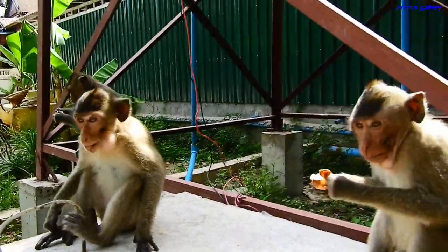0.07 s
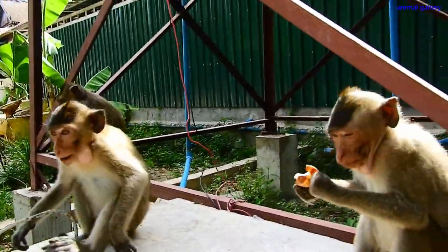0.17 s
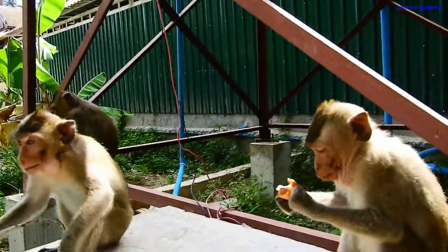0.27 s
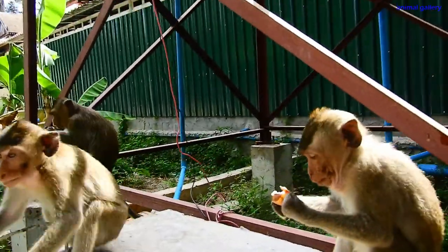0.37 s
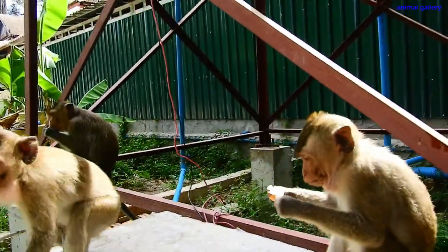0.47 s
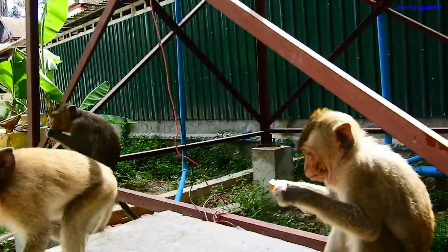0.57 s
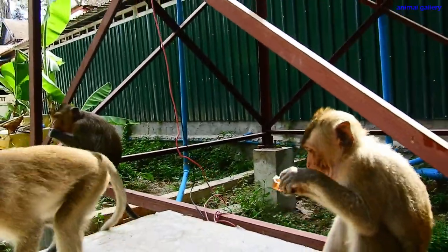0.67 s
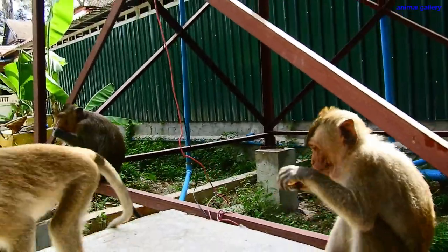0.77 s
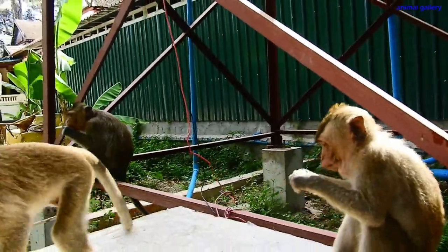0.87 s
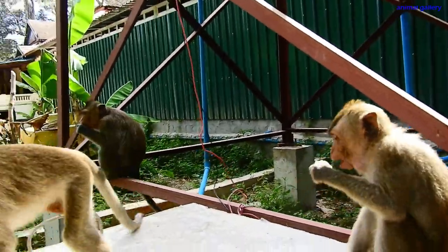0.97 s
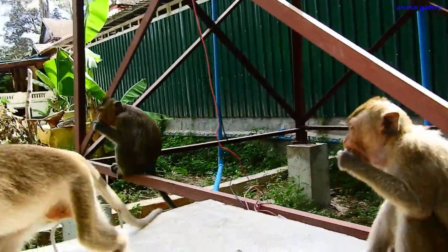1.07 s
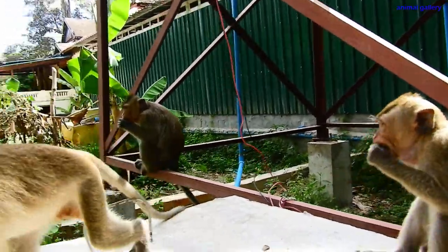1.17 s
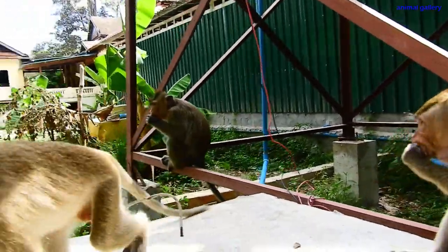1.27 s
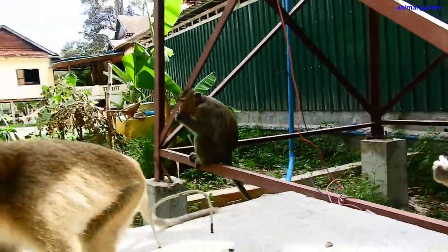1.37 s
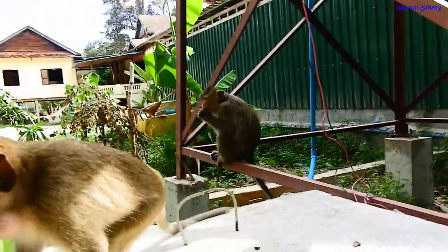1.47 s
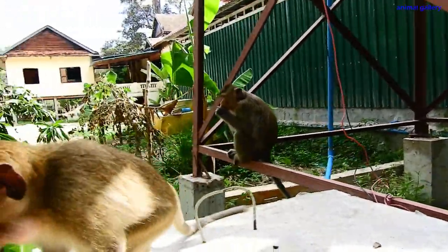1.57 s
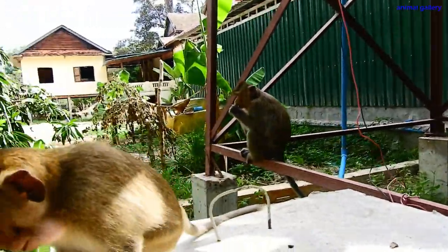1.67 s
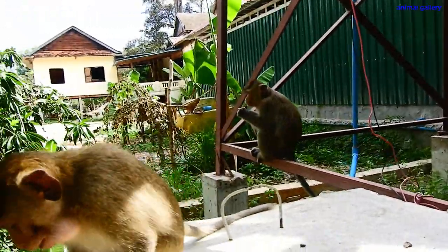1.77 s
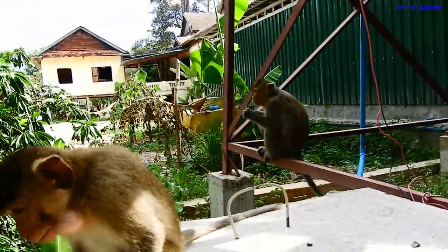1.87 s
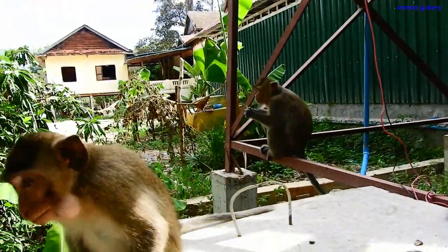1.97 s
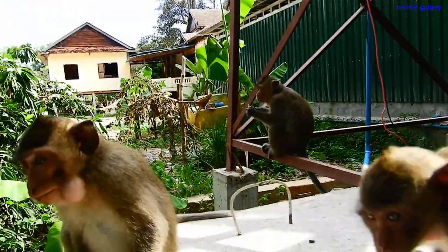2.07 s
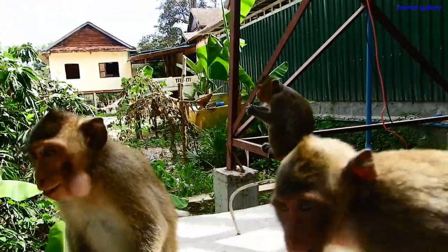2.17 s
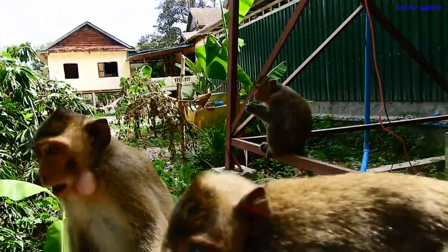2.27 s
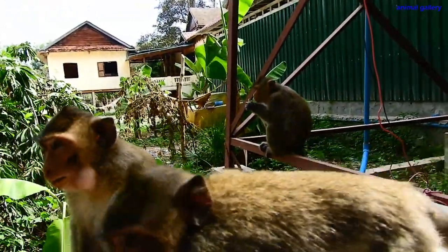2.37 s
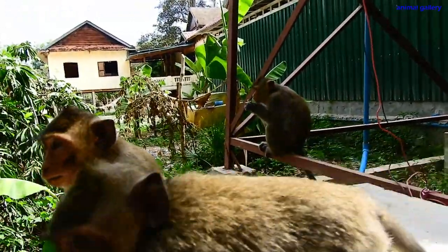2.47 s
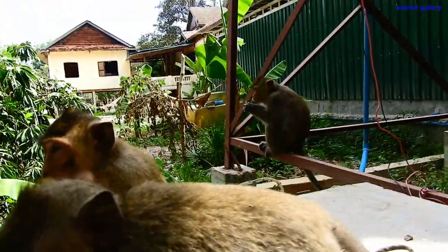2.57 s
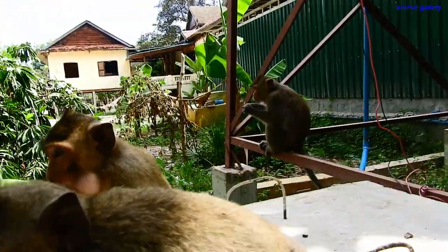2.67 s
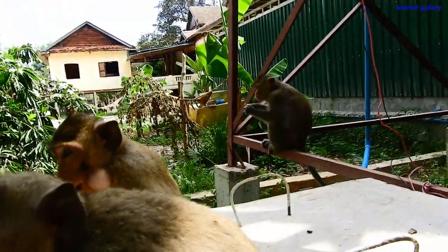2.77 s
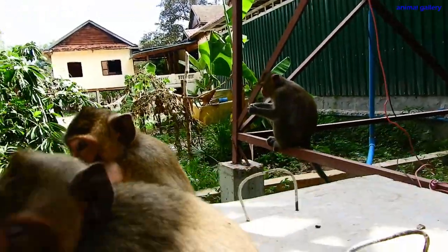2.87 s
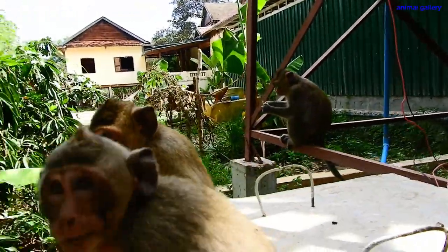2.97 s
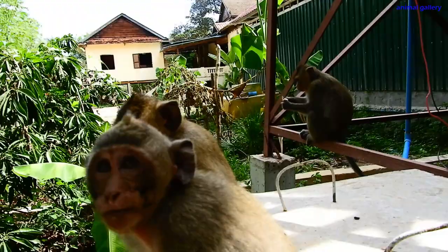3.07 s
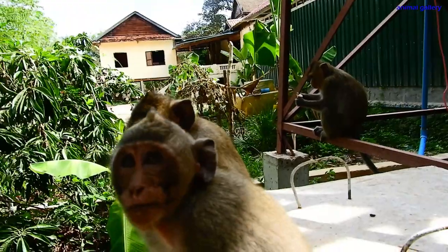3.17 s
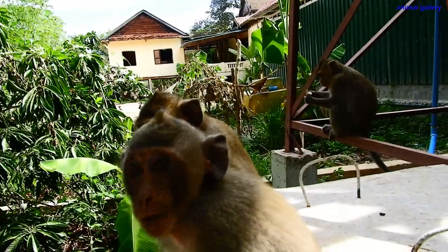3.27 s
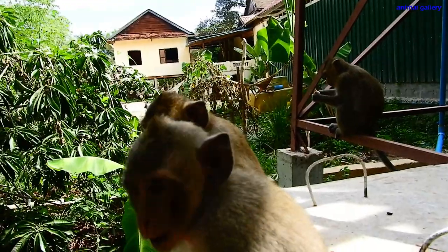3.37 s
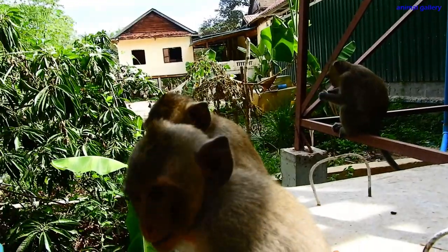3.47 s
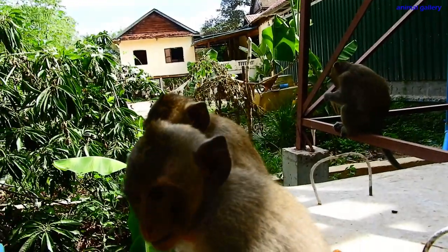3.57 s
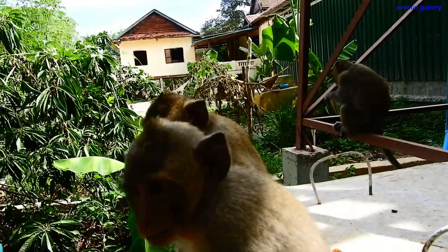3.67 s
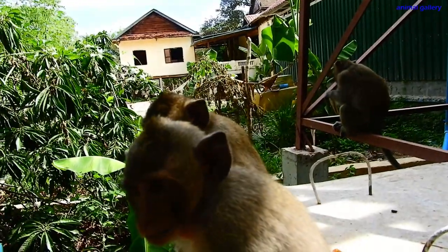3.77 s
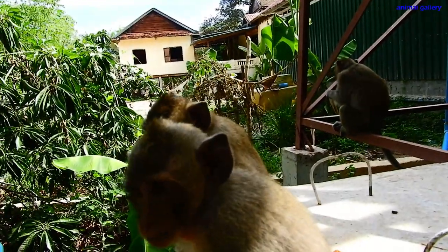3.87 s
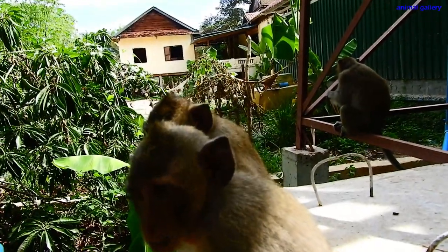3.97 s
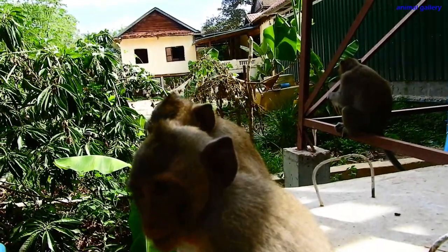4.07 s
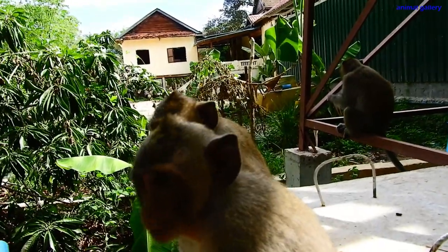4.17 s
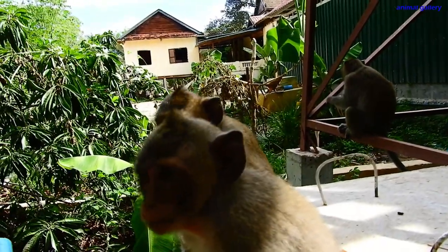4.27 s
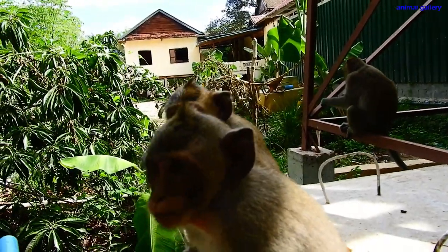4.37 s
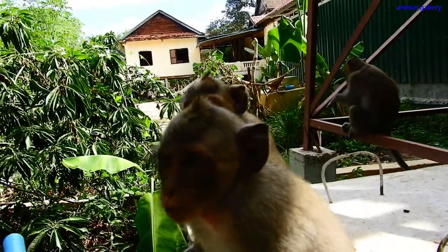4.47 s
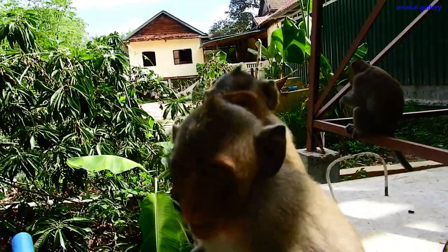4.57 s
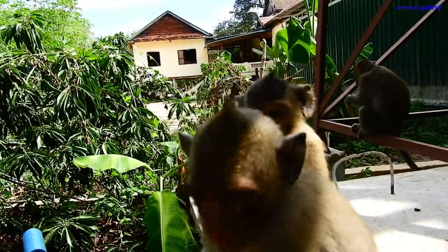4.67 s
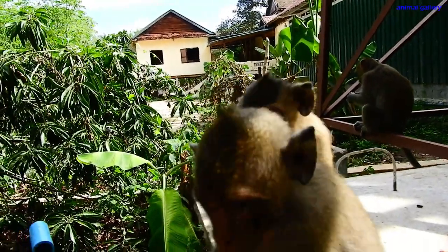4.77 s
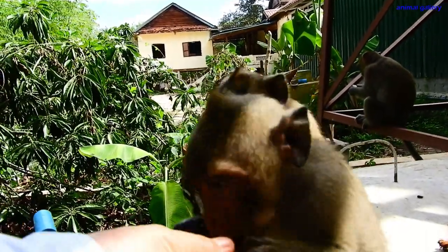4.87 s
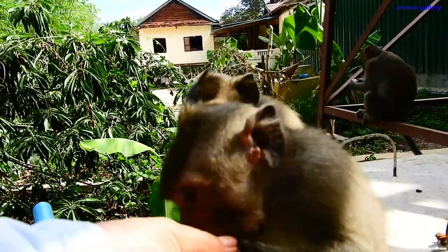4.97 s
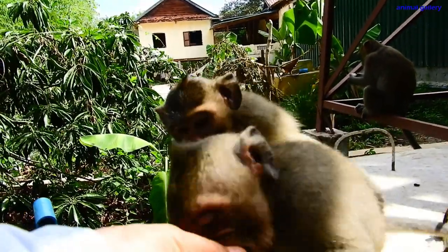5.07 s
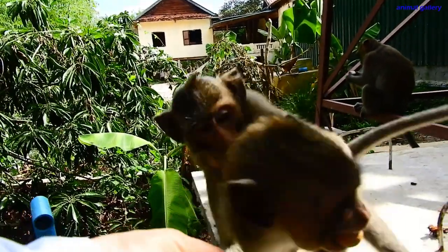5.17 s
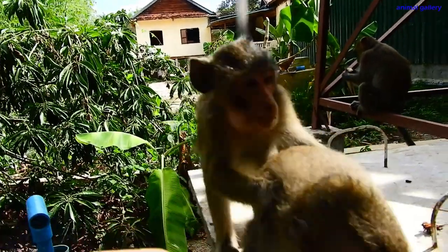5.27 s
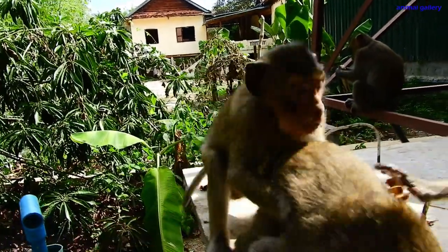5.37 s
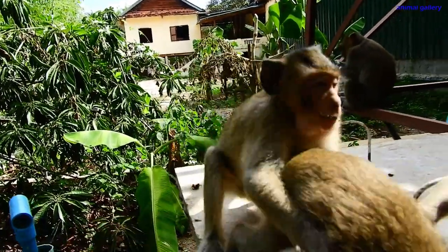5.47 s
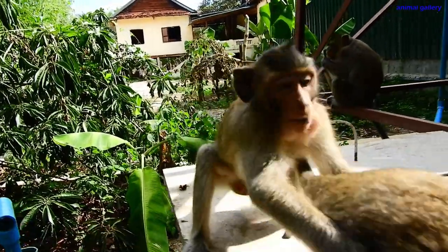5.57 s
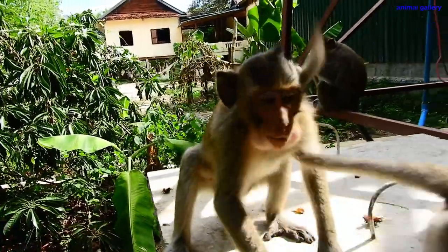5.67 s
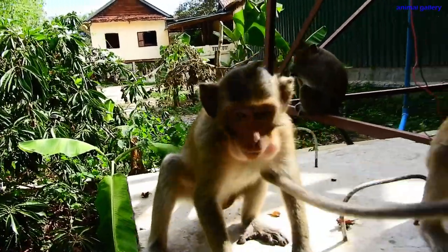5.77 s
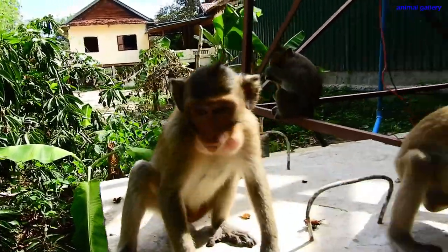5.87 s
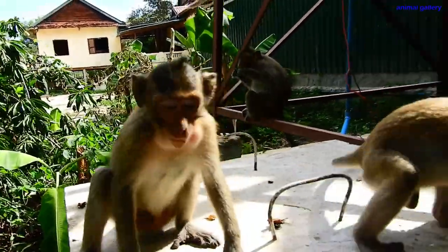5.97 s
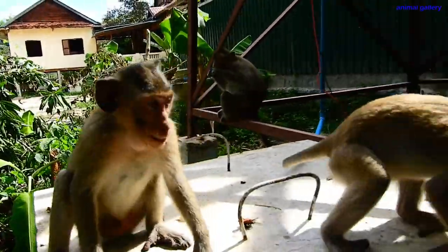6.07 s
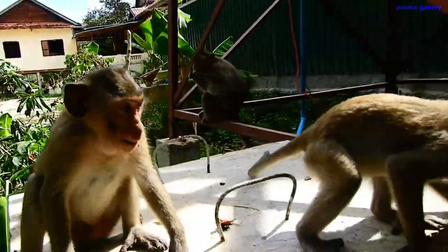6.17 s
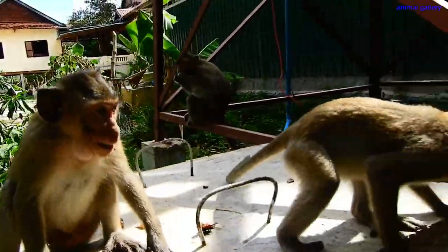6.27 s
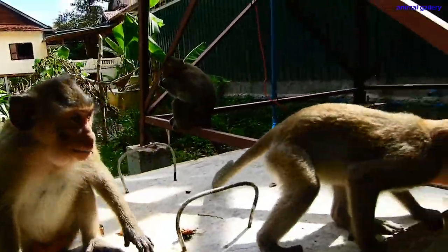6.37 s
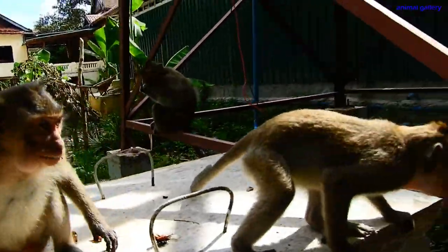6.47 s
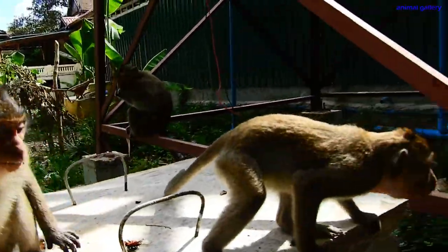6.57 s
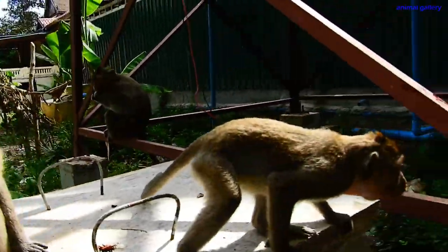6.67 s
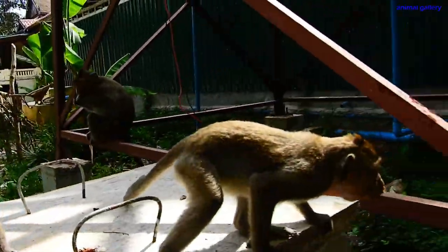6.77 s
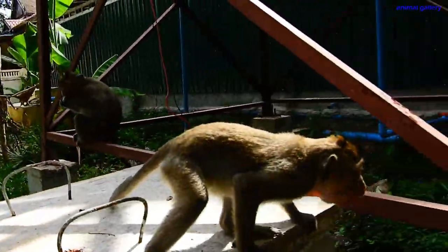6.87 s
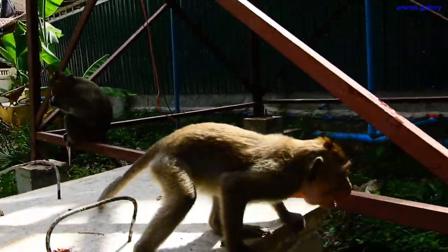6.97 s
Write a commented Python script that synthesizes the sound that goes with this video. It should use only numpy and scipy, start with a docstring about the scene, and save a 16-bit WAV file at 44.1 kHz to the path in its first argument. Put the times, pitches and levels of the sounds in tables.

```python
"""A quick run of grunts and one shrill squeal, harsh at first, then clear, then falling, from a macaque nearby.
Monkeys scuffle on a concrete slab and bump a steel frame; insects buzz and chirp over a distant rumble.
The voice sums jittered harmonics with chaotic rasp; contacts are decaying noise bursts and ringing modes.
Insects and air are filtered noise. A gain control ducks under the squeal and slowly recovers."""
import sys
import numpy as np
from scipy import signal
from scipy.fft import rfft, irfft, next_fast_len
from scipy.io import wavfile
from scipy.ndimage import uniform_filter1d, minimum_filter1d, map_coordinates

SR = 44100
rng = np.random.default_rng(int(sys.argv[2]) if len(sys.argv) > 2 else 0)


def log_audio(samples):
    """Write samples as a 16-bit WAV file to the path given in sys.argv[1]."""
    # one column per channel
    frames = np.atleast_2d(samples).T
    # limit to full scale, then quantise
    limited = np.clip(frames, -1, 1)
    pcm = np.round(limited * 32767).astype(np.int16)
    wavfile.write(sys.argv[1], SR, pcm)


N = 309802


def amp(db):
    """Convert decibels to an amplitude ratio."""
    return 10 ** (np.asarray(db) / 20)


def unit(x):
    """Normalise the mean power, so that the rms is 1."""
    return x / np.sqrt(np.mean(x ** 2) + 1e-20)


def along(points, hz):
    """Interpolate (frequency_hz, value) points on a logarithmic frequency axis."""
    f, v = np.transpose(points)
    return np.interp(np.log(hz + 1), np.log(f + 1), v)


def curves(rows):
    """Interpolate each column after the time linearly, one value per sample from first row to last."""
    s, *cols = np.transpose(rows)
    return [np.interp(np.arange(s[0], s[-1], 1 / SR), s, c) for c in cols]


def add(track, s, sound):
    """Superpose a sound on a track from time s, cut off at the track's end."""
    part = track[..., max(0, round(s * SR)):][..., :sound.shape[-1]]
    part += sound[..., :part.shape[-1]]


def wobble(rate, n):
    """Random modulation: a smooth spline through random knots, rate knots a second."""
    knots = rng.standard_normal(int(n * rate / SR) + 4)
    return map_coordinates(knots, [np.arange(n) * rate / SR])


def filtered(x, response):
    """Linear filtering: multiply the spectrum of x by a response of frequency."""
    n = x.shape[-1]
    m = next_fast_len(n + 8192)
    return irfft(rfft(x, m) * response(np.fft.rfftfreq(m, 1 / SR)), m)[..., :n]


def noise(spectrum, shape):
    """Coloured noise of rms 1: white noise shaped by (frequency_hz, level_db) points."""
    white = rng.standard_normal(shape)
    return unit(filtered(white, lambda hz: amp(along(spectrum, hz))))


def resonant(peaks):
    """Resonance: stereo white noise through narrow peaks (centre_hz, half_width_hz, level_db), rms 1."""
    def gain(hz):
        return sum(amp(db) / (1 + ((hz - centre) / width) ** 2) for centre, width, db in peaks)
    return unit(filtered(rng.standard_normal((2, N)), gain))


def patchy(x, depth_db):
    """Spectral fluctuation: energy shifts at random between neighbouring bands, over hundredths of a second."""
    z = signal.stft(x, nperseg=256)[2]
    field = uniform_filter1d(rng.standard_normal(z.shape[1:]), size=2, axis=0)  # across frequency
    field = uniform_filter1d(field, size=6, axis=1)  # across time
    gain = amp(depth_db * np.tanh(unit(field)))
    return signal.istft(z * gain, nperseg=256)[1][:, :x.shape[-1]]


def envelope(n, db, attack, release, fade):
    """Amplitude envelope: a soft swell, an exponential fade in dB per second, and a linear release."""
    t = np.arange(n) / SR
    return amp(db - fade * t) * np.minimum(1, t / attack) ** 2 * np.minimum(1, (n / SR - t) / release)


def spread(pair):
    """Interaural coherence: two unrelated sounds form a field near mono in the bass, diffuse in the treble."""
    # left-right correlation: frequency_hz, correlation
    likeness = [(60, 0.98), (130, 0.93), (290, 0.78), (640, 0.35), (1410, 0.73), (3100, 0.3), (6820, 0.11),
                (15000, -0.21)]

    def mix(hz):
        turn = np.arccos(np.clip(along(likeness, hz), -1, 1)) / 2
        return np.array([np.cos(turn), np.sin(turn)])
    mid, side = filtered(pair, mix)
    return np.array([mid + side, mid - side])


def panned(x, right_db):
    """Level-difference panning: the right channel is right_db louder than the left."""
    return x * amp([[-right_db / 2], [right_db / 2]])


def outdoors():
    """Broadband random sound: distant rumble and leaf hiss, crackling rustles and a far whine."""
    # spectrum of the background air: frequency_hz, level_db
    air_colour = [(22, -20.5), (32, -16.5), (42, -1.5), (100, 0.5), (160, -5), (260, -14), (500, -18.5),
                  (1000, -22), (2000, -29.5), (4000, -26.5), (9300, -26.5), (11500, -40.5), (15500, -47.5)]
    # spectrum of fur and leaves: frequency_hz, level_db
    leaf_colour = [(300, -13), (800, 1.5), (1200, -1.5), (2200, 1), (2800, -2), (4000, -5.5), (9000, -5.5),
                   (12000, -28), (15500, -31.5)]
    # rustles whenever a monkey shifts: start_s, length_s, level_db
    rustle_times = [(.1, .65, -57.5), (.67, .85, -53.5), (1.38, .8, -55), (2.05, 1.0, -61),
                    (3.78, .55, -58), (4.5, .8, -65), (6.58, .6, -61)]
    # faint distant whine: start_s, length_s, level_db, attack_s, release_s, fade_db_per_s
    far_call = (3.05, 1.18, -66.5, .12, .15, 1.5)
    # resonances of the whine: centre_hz, half_width_hz, level_db
    far_tones = [(2440, 180, 3.5), (3310, 80, -2)]

    air = amp(-51 + 0.45 * wobble(6.2, N)) * noise(air_colour, (2, N))
    stir_power = np.full(N, amp(-69) ** 2)  # a faint stir never stops
    for s, length, db in rustle_times:
        swell = envelope(round(length * SR), db, attack=.04, release=.25, fade=8)
        add(stir_power, s, swell ** 2)
    crinkle = unit(patchy(noise(leaf_colour, (2, N)), depth_db=4))
    flutter = amp(1.62 * wobble(120, N) + 1.6 * wobble(16, N))
    rustle = np.sqrt(stir_power) * flutter * crinkle
    s, length, *shape = far_call
    n = round(length * SR)
    add(air, s, envelope(n, *shape) * resonant(far_tones)[:, :n])
    return spread(air + rustle)


def insects():
    """Amplitude-modulated wing resonance: one insect buzzes steadily, another pulses about six times a second."""
    # drifting pace and strength of the chirps: time_s, chirps_per_s, level_db
    chirping = [(0.0, 6.043, -57.9), (1.0, 6.25, -54.8), (1.95, 6.528, -62.6), (2.5, 5.683, -58.0),
                (3.2, 5.744, -55.9), (4.0, 6.274, -56.6), (5.7, 5.442, -57.0), (6.4, 6.222, -56.5),
                (7.02, 5.629, -58.1)]
    # wing resonances of each insect: centre_hz, half_width_hz, level_db
    chirp_wing = [(5136, 190, 1.5), (5550, 400, -33), (10150, 400, -21.5)]
    buzz_wing = [(7265, 200, 11.5), (6950, 83, -4.5), (7550, 250, -23.5)]
    first_chirp_s, swell_s = .04, .028

    s, *columns = np.transpose(chirping)
    pace, level_db = (np.interp(np.arange(N) / SR, s, column) for column in columns)
    beats = np.cumsum(pace) / SR
    chirp_times = first_chirp_s + np.searchsorted(beats, np.arange(beats[-1])) / SR
    u = np.arange(SR // 5) / SR / swell_s
    pulse = (u * np.exp(1 - u)) ** 2  # crests at u = 1
    swells = np.zeros(N)
    for s in chirp_times:
        add(swells, s - swell_s, amp(rng.normal(0, 1.0)) * pulse)
    chirps = amp(level_db) * (swells + amp(-11.5)) * resonant(chirp_wing)  # a floor fills the gaps
    buzz_db = -58.5 + 0.73 * wobble(25, N) + 0.92 * wobble(300, N) + .5 * wobble(1, N)
    buzz = amp(buzz_db) * resonant(buzz_wing)
    return panned(chirps + buzz, right_db=2)


def tap(db, hz, octaves, t60):
    """Heavily damped impact: a decaying noise band, lower for a soft paw, higher for grit; long ones start gently."""
    # contacts carry little at the very top: frequency_hz, level_db
    soft_top = [(9300, -1.5), (11000, -8), (14000, -30.5)]
    t = np.arange(SR // 4) / SR

    def band(f):
        return np.exp(-(np.log2((f + 1) / hz) / octaves) ** 2 / 2) * amp(along(soft_top, f))
    burst = unit(filtered(rng.standard_normal((2, len(t))), band))
    return burst * amp(db - 60 * t / t60) * (1 - np.exp(-t / (0.018 * t60)))


def taps():
    """Damped impacts and friction: paws thud and scuff, food ticks, claws scrape, something snaps."""
    # soft paws landing on the slab: start_s, level_db, centre_hz
    thuds = [(1.288, -48, 282), (1.5, -41.5, 160), (1.9, -48, 230), (3.574, -42.5, 490), (4.054, -44, 220),
             (5.206, -35, 110), (5.325, -42, 220), (5.388, -27.5, 180), (5.535, -42, 350)]
    # feet scuffing over the slab: start_s, level_db
    scuffs = [(.495, -55.5), (.695, -48.5), (.85, -50), (1.48, -52.5)]
    # dry ticks of food and twigs: start_s, level_db, centre_hz, t60_s
    ticks = [(.139, -46, 900, .03), (1.018, -44, 2900, .05), (2.285, -51, 1700, .05),
             (2.334, -49, 1900, .05), (2.72, -50, 1810, .08), (3.318, -46.5, 1000, .07),
             (3.576, -47, 1100, .06), (4.525, -49, 2100, .05), (4.565, -50, 2000, .07),
             (4.863, -39.5, 1890, .02), (6.864, -40, 850, .04)]
    # claws scraping grit: start_s, level_db, t60_s
    scrapes = [(1.023, -39, .06), (2.34, -49, .05), (2.714, -45, .08), (4.564, -44, .1), (5.918, -31, .023),
               (6.166, -45, .05), (6.276, -39, .026), (6.868, -38.5, .057)]

    out = np.zeros((2, N))
    for s, db, hz in thuds:
        add(out, s, tap(db, hz, octaves=.55, t60=.12))
    for s, db in scuffs:
        add(out, s, tap(db, hz=2150, octaves=.42, t60=.45))
    for s, db, hz, t60 in ticks:
        add(out, s, tap(db, hz, octaves=.5, t60=t60))
    for s, db, t60 in scrapes:
        add(out, s, tap(db, hz=7200, octaves=.85, t60=t60))
    # one hard snap close by: crack and after-ring
    crack = tap(db=-20.3, hz=1950, octaves=.55, t60=.007)
    after_ring = tap(db=-44, hz=1400, octaves=1.1, t60=.07)
    add(out, 6.2646, crack + after_ring)
    # faint ticks scattered at random
    for when, strength, pitch in rng.uniform(size=(36, 3)):
        faint = tap(-57 + 7 * strength, 700 * 2 ** (2 * pitch), octaves=0.35, t60=0.05)
        add(out, when * N / SR, faint)
    return panned(spread(out), right_db=3)


def ring(hz, db, t60):
    """Free vibration: one mode of struck steel decays exponentially after a short onset."""
    t = np.arange(SR) / SR
    return amp(db - 60 * t / t60) * np.sin(2 * np.pi * hz * t) * (1 - np.exp(-t / 0.0017))


def bar():
    """Single-mode vibration: a thin steel bar, knocked in the scuffle, rings on with one tone."""
    # the ringing bar: start_s, pitch_hz, level_db, t60_s
    s, hz, db, t60 = (5.59, 914, -53, 1.3)
    out = np.zeros(N)
    add(out, s, ring(hz, db, t60))
    return out


def frame():
    """Modal excitation: bumps thud on the steel frame and set its modes ringing."""
    # bumps on the frame: start_s, ring_level_db, thud_level_db
    bumps = [(5.592, -57, -44), (5.87, -37.3, -39.5), (5.907, -50, -37.5)]
    # modes of the frame: frequency_hz, level_db relative to the ring level, t60_s
    modes = [(209, -5, 0.21), (318, -3, .12), (387, -2, 0.4), (820, 6, 0.15), (1870, -19, 0.092)]
    # frequency_hz, level_db
    thud_colour = [(100, -16), (300, -4.5), (900, -14), (1300, -22.5), (2500, -22), (8000, -30), (12000, -48)]

    out, t = np.zeros(N), np.arange(SR) / SR
    for s, db, thud_db in bumps:
        thud = amp(thud_db - 60 * t / .07) * noise(thud_colour, len(t))
        # each bump excites the modes a little differently
        ringing = sum(ring(hz, db + level + rng.normal(0, 1.3), t60) for hz, level, t60 in modes)
        add(out, s, thud + ringing)
    return panned(out, right_db=2)


def grunts():
    """Periodic fold vibration: a few low cycles per grunt, modulating a hoarse rasp through the throat."""
    # the grunts: start_s, length_s, level_db, pitch_hz
    calls = [(5.037, 0.017, -47, 345), (5.074, .028, -39.5, 327), (5.122, .027, -39.5, 315),
             (5.169, 0.034, -41.5, 312), (5.222, 0.019, -42, 305)]
    # spectrum of the hoarse air: frequency_hz, level_db
    throat_air = [(150, -16), (400, 1.5), (560, -15), (750, 1.5), (950, -1.5), (1200, -25), (1650, -15),
                  (2300, -16), (6000, -21), (9000, -18), (12000, -44.5)]

    out = np.zeros(N)
    for s, length, db, hz in calls:
        n = round(length * SR)
        pitch = hz * (1 + .02 * wobble(200, n))
        tone = np.sqrt(2) * np.sin(2 * np.pi * np.cumsum(pitch) / SR)
        hoarse = unit(noise(throat_air, n) * amp(2.5 * tone))  # the rasp swells once a cycle
        voiced = tone * signal.windows.tukey(n, .8)
        breath = amp(-5) * hoarse * signal.windows.tukey(n, .25)
        add(out, s, amp(db) * (voiced + breath))
    return panned(out, right_db=9)


def rasp():
    """Chaotic fold vibration: each push of air makes the folds rasp, darkening as the mouth narrows."""
    # pushes of air: start_s, length_s, level_db (before the squeal's lift), attack_s, release_s, fade_db_per_s
    pushes = [(5.21, .18, -15, .02, .03, 105), (5.335, .235, -28, .06, .03, 1)]
    # spectra through the open and the narrowed mouth: frequency_hz, level_db
    wide_mouth = [(710, -69), (1200, -24), (1960, -24), (2680, -5), (3210, -20), (3460, -19.5), (3650, -6),
                  (4240, -12), (4880, 2), (6510, -4.5), (8980, -4), (10200, 5.5), (15500, -36.5)]
    narrow_mouth = [(1200, -28), (2100, -28.5), (2700, -6), (3100, -4), (3900, -23.5), (4900, -9),
                    (6300, -1.5), (8000, 0.5), (9200, 2), (10200, -22), (13300, -13.5), (14500, -47),
                    (15500, -47.5)]
    mouth_closes_s, closing_s = 5.24, .036

    force = np.zeros(N)
    for s, length, *shape in pushes:
        add(force, s, envelope(round(length * SR), *shape))
    opening = np.clip(1 - (np.arange(N) / SR - mouth_closes_s) / closing_s, 0, 1)
    wide = np.sqrt(opening) * noise(wide_mouth, (2, N))
    narrow = np.sqrt(1 - opening) * noise(narrow_mouth, (2, N))
    mid, side = patchy(wide + narrow, depth_db=6)
    bursts = unit(amp(1.5 * wobble(450, N)))  # the folds slap together irregularly
    return force * bursts * unit(mid + 0.67 * np.array([side, -side]))


def folds(gesture, shape, partials, rough, jitter_rate, shimmer_db, surge_db=0):
    """Jitter and shimmer: harmonics scatter in pitch and level; pitch most in fast glides and between surges."""
    surge_hz, surge_peak_s = 38.5, 5.271  # rate, time of one crest
    slip_s = .0025  # pitch scatter (a share) added for each octave a second of glide

    hz, = curves(gesture)
    n = len(hz)
    t = gesture[0][0] + np.arange(n) / SR
    surge = amp(surge_db * np.cos(2 * np.pi * surge_hz * (t - surge_peak_s)))
    glide = np.abs(np.gradient(np.log2(hz))) * SR  # octaves per second
    scatter = (rough + slip_s * glide) / surge ** 2
    phase = 2 * np.pi * np.cumsum(hz * (1 + scatter * wobble(jitter_rate, n))) / SR
    wave = sum(amp(level + shimmer_db * wobble(250, n)) * np.sin(round(k) * phase) for k, level in partials)
    return envelope(n, *shape) * surge * unit(wave)


def squeal():
    """Register transitions: the voice jumps between three registers over the rasp, with a lower whistle."""
    # pitch gestures of the registers and of a second whistle in the throat: time_s, pitch_hz
    screech, held, fall, whistle = [(5.212, 3150), (5.245, 2200), (5.271, 1920), (5.297, 1870),
                                    (5.322, 2440), (5.355, 2300)], [(5.34, 2300), (5.392, 2295), (5.415, 2325),
                                                     (5.44, 2265), (5.49, 2110)], [(5.498, 1760), (5.52, 1630),
                                                                   (5.542, 1450), (5.56, 1415),
                                                                   (5.578, 1300)], [(5.474, 3080),
                                                                                 (5.495, 3090),
                                                                                 (5.535, 3010)]
    # partials of each register: multiple of the pitch, relative level_db
    screech_partials = [(1, -34.5), (2, -16), (3, 2), (4, -10), (5, -17)]
    held_partials = [(1, -37), (2, -12), (3, 5), (4, 5), (5, -21), (6, -29)]
    fall_partials = [(2, -30), (3, -22), (4, -9), (5, 5), (6, -13)]
    # swell and decay: level_db (before the lift below), attack_s, release_s, fade_db_per_s
    screech_shape, held_shape = (-18.5, .012, .03, 60), (-23, .055, .025, 18)
    fall_shape, whistle_shape = (-21, .012, .014, 100), (-27.5, .014, .02, 230)
    # level difference at the two ports: frequency_hz, left_minus_right_db
    facing = [(1500, -3.5), (2900, -8.5), (4500, -4.5), (6500, -1), (9000, -2.5), (12000, 0)]
    lift_db, lag_s = 7, 2.2e-5  # the sound reaches the right port first

    voice = rasp()
    add(voice, screech[0][0], folds(screech, screech_shape, screech_partials,
                                    rough=.025, jitter_rate=1500, shimmer_db=3.2, surge_db=3))
    add(voice, held[0][0], folds(held, held_shape, held_partials,
                                 rough=.002, jitter_rate=860, shimmer_db=2.9))
    add(voice, fall[0][0], folds(fall, fall_shape, fall_partials,
                                 rough=.002, jitter_rate=840, shimmer_db=4))
    add(voice, whistle[0][0], folds(whistle, whistle_shape, [(1, 0)],
                                    rough=.008, jitter_rate=1500, shimmer_db=3.5))
    port = np.array([[1], [-1]])  # left, right

    def direction(hz):
        return amp(port * along(facing, hz) / 2) * np.exp(-1j * np.pi * hz * lag_s * port)
    return amp(lift_db) * filtered(voice, direction)


def yard(x, early_db, tail_db):
    """Reverberation: slab and sheet-metal wall return a few quick copies, then a short diffuse tail."""
    # decay time of the tail: frequency_hz, t60_s
    decay = [(200, .3), (3000, 0.29), (7500, 0.48), (14000, 0.34)]
    hz, t, z = signal.stft(rng.standard_normal((2, SR // 2)), SR, nperseg=256)
    tail = signal.istft(z * amp(-60 * t / along(decay, hz)[:, None]), SR, nperseg=256)[1]
    echo = amp(tail_db) * tail / np.linalg.norm(tail[0])
    for side in echo:
        delays = (rng.uniform(.001, .014, size=8) * SR).astype(int)
        side[delays] += amp(early_db) * rng.choice([-1, 1], size=8)
    return x + signal.fftconvolve(x, echo, axes=1)[:, :N]


def scene():
    """Superposition: the reverberant voice and frame join the dry contacts, insects and background."""
    background = outdoors() + insects()
    contacts = taps() + bar()
    reverberant = yard(frame() + grunts() + squeal(), early_db=-19.5, tail_db=-15)
    return background + contacts + reverberant


def gain_control(x, limit_db, hold, recovery_db):
    """Automatic gain: loud sound pulls it down at once; it holds, then climbs by recovery_db a second."""
    power = uniform_filter1d(np.mean(x ** 2, axis=0), size=900)
    level = np.sqrt(np.abs(power) + 1e-12)
    needed = np.minimum(0, limit_db - 20 * np.log10(level))
    span = 2 * int(hold * SR / 2) + 1
    held = minimum_filter1d(needed, span, origin=span // 2, mode="nearest")  # lowest gain of the hold time
    climb = recovery_db * np.arange(N) / SR
    return x * amp(np.minimum.accumulate(held - climb) + climb)


def record(dry):
    """Level compression and band limiting: the gain is ridden and nothing is kept above 15750 Hz."""
    ridden = gain_control(dry, limit_db=-16.9, hold=0.72, recovery_db=9.5)
    return filtered(ridden, lambda hz: hz < 15750)


dry = scene()
out = record(dry)
log_audio(out)
```